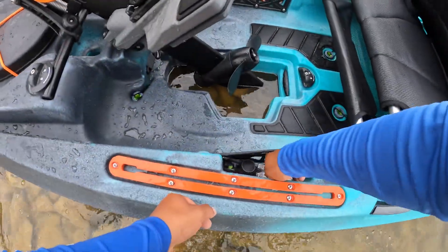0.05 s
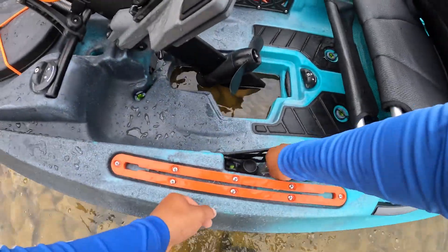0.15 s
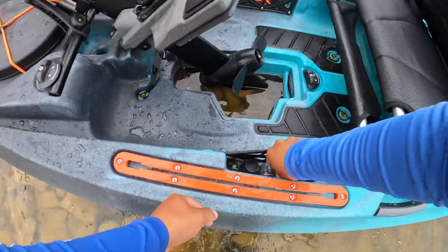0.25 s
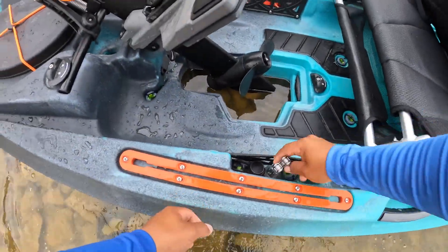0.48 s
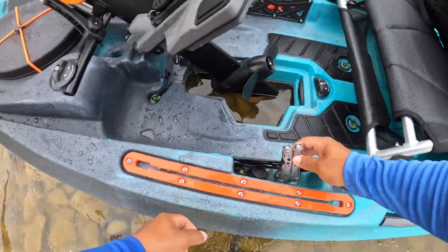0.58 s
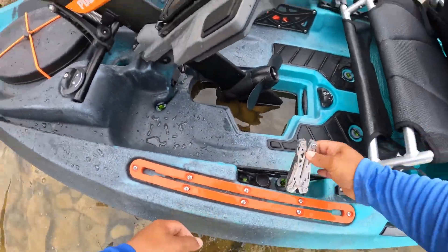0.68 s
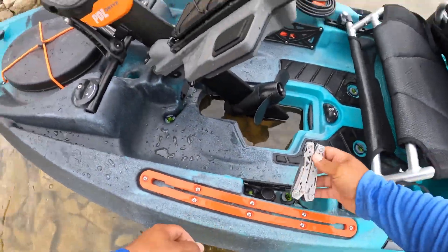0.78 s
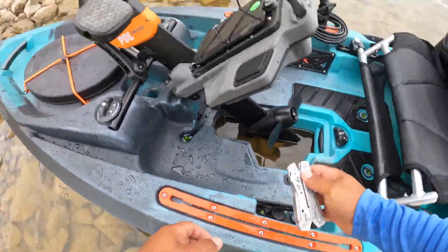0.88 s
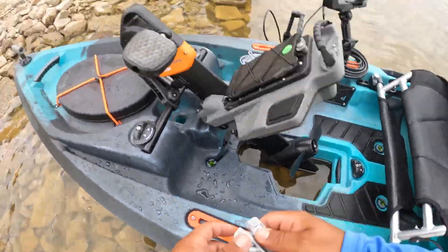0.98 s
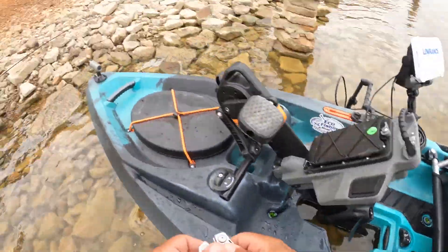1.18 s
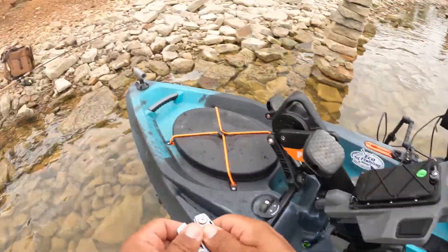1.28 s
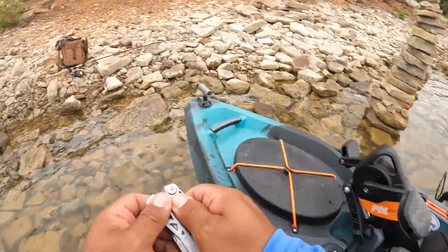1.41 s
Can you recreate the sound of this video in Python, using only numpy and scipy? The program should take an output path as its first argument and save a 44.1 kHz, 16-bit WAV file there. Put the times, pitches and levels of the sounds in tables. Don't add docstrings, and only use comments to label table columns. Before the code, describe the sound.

Hard clattering of a metal tool pulled from a plastic kayak pocket, fading into quiet air.

```python
import sys
import numpy as np
from scipy import signal
from scipy.fft import rfft, irfft, next_fast_len
from scipy.io import wavfile
from scipy.ndimage import uniform_filter1d

SR = 44100
rng = np.random.default_rng(int(sys.argv[2]) if len(sys.argv) > 2 else 0)


def inscribe(sig):
    pcm = np.round(np.clip(np.atleast_2d(sig).T, -1, 1) * 32767)
    wavfile.write(sys.argv[1], SR, pcm.astype(np.int16))


def amplitude_ratio(level_db):
    exponent = np.asarray(level_db, float) / 20
    return 10 ** exponent


N = 63945

# (time [s], level [dB], tick above 3 kHz [dB], chatter length [ms], struck panel [Hz])
CONTACTS = [(0.191, -46.5, -53, 1.5, 1280), (0.2036, -23.5, -38, 1.5, 940), (0.2099, -29, -70, 1.64, 990),
            (0.258, -42, -51.5, 1.2, 1890), (0.295, -24.5, -39.5, 3.3, 1050),
            (0.3237, -26.5, -50.5, 2.6, 1200), (0.3435, -24.5, -40, 1.2, 1240),
            (0.3477, -23.5, -36.5, 6.4, 1400), (0.4420, -29, -36, 2.6, 1550),
            (0.4495, -22.5, -49, 2.9, 1720), (0.483, -20, -34.5, 1.7, 934), (0.4969, -19.5, -37, 4.6, 1040),
            (0.5452, -16.5, -24.5, 1.35, 1250), (0.5594, -16.5, -33.5, 0.37, 916),
            (0.6624, -15.5, -27, 1.24, 1500), (0.6745, -19, -35.5, 1.5, 1430), (0.6791, -21, -35, 3.2, 990),
            (0.6998, -26, -39.5, 0.8, 1190), (0.711, -24, -41.5, 3.6, 1070), (0.7459, -17, -32, 3.4, 1620),
            (1.1144, -42.5, -64, 0.91, 1020), (1.1293, -43, -86, 7.6, 1620), (1.2744, -74, -62.5, 12, 1010),
            (1.3939, -49.5, -88, 26, 1360)]
# (frequency [Hz], level [dB], t60 [s])
DECK_MODES = [(126.6, -2.5, 0.15), (204.4, -3.5, 0.193), (280, -0.5, 0.09), (396, 10, 0.051),
              (578.7, 1.5, 0.06), (700, 5, 0.05), (1005, -5.5, 0.04), (1138, -13, 0.078), (1403, -3, 0.046),
              (1686, 1.5, 0.011), (1783, -12.5, 0.048), (2100, -15.5, 0.088)]
# (frequency [Hz], level [dB], t60 [s])
TOOL_MODES = [(2770, 7, 0.039), (3463, 7, 0.02), (4400, 5.5, 0.007), (5030, 10, 0.004), (5700, 2, 0.0076),
              (7060, 0, 0.0071), (11110, -14.5, 0.023), (12900, -8, 0.0015)]
GRIP_S = 0.18


def unit(x):
    return x / np.sqrt(np.mean(x ** 2) + 1e-18)


def curve(table):
    points = np.array(table)
    return np.interp(np.arange(N) / SR, points[:, 0], points[:, 1])


def ring(force, hz, t60):
    pole = np.exp(2j * np.pi * hz / SR - np.log(1000) / (t60 * SR))
    return signal.lfilter([1], [1, -pole], force).imag


def colour(x, table):
    points, size = np.array(table), next_fast_len(2 * N)
    hz = np.arange(size // 2 + 1) * SR / size + 1
    gain = amplitude_ratio(np.interp(np.log(hz), np.log(points[:, 0]), points[:, 1]))
    return irfft(rfft(x, size) * gain, size)[..., :N]


def walk(rate_hz):
    k = int(SR / rate_hz)
    held = np.repeat(rng.standard_normal(N // k + 1), k)
    return unit(uniform_filter1d(uniform_filter1d(held, k), k)[:N])


def body(forces, modes):
    return sum(amplitude_ratio(db) * ring(force, hz, t60) for force, (hz, db, t60) in zip(forces, modes))


def opposed(db):
    return np.array([[db], [-db]]) / 2


def strike(modes, tail_s, column):
    tail_db, scatter_db, detune = -10.5, 2.5, 0.07
    panel_db, panel_octaves = 8, 0.16
    length = 5000
    out, t = np.zeros(N + length), np.arange(length) / SR
    for row in CONTACTS:
        i, chatter_ms, panel_hz = int(row[0] * SR), max(row[3], 0.3), row[4]
        common = rng.standard_normal(length) ** 3 * np.exp(-t * 1000 / chatter_ms)
        common[0] = 6
        common = common / np.sqrt(np.sum(common ** 2))
        hit = 0
        for hz, db, t60 in modes * 3:
            luck = rng.standard_normal(3)
            tail = rng.standard_normal(length) * np.exp(-t / tail_s)
            force = np.sign(luck[2]) * common + amplitude_ratio(tail_db) * tail / np.sqrt(np.sum(tail ** 2))
            near_db = panel_db * np.exp(-(np.log2(hz / panel_hz) / panel_octaves) ** 2)
            gain = amplitude_ratio(db + near_db + scatter_db * luck[0])
            hit = hit + gain * ring(force, hz * (1 + detune * luck[1]), t60 * 0.81)
        out[i:i + length] += amplitude_ratio(row[column]) * hit / np.max(np.abs(hit))
    return out[:N]


def clacks():
    upper = [(hz, db - 14 * (hz < 500) - 4 * (hz < 900), t60) for hz, db, t60 in DECK_MODES]
    deck = strike(upper, tail_s=0.015, column=1)
    tick = strike(TOOL_MODES, tail_s=0.0054, column=2)
    return amplitude_ratio(2.5) * deck + amplitude_ratio(8) * tick


def cracks():
    # (frequency [Hz], level [dB])
    spectrum = [(1200, -17), (2200, -14.5), (5000, 11), (7000, -21), (9000, -28), (13000, -32),
                (16000, -25)]
    level_db, decay_s, chatter_share = 9.5, 0.0023, 0.23
    out, t = np.zeros(N + 900), np.arange(900) / SR
    for row, noise in zip(CONTACTS, rng.standard_normal((len(CONTACTS), 900))):
        i = int(row[0] * SR)
        decay = np.exp(-t / (decay_s + chatter_share * row[3] / 1000))
        out[i:i + 900] += amplitude_ratio(row[2] + level_db) * noise * decay / 2
    return colour(out[:N], spectrum)


def thuds():
    # (time [s], level [dB], pitch [Hz], t60 [s])
    pushes = [(0.041, -36, 195.6, 0.12), (0.037, -47, 139, 0.061), (.026, -38.5, 357, .12),
              (.058, -39.5, 258, 0.18), (.2045, -32, 1123, 0.037), (.2045, -35, 2980, 0.022),
              (.265, -38, 256, 0.13), (.3245, -23.5, 724, .04), (.3255, -32, 1110, .03),
              (.38, -19, 75, 0.085), (.4495, -28, 1690, 0.025), (.4835, -29, 970, 0.022),
              (.5465, -23, 2110, 0.036), (.566, -23, 280, 0.22), (.575, -22, 700, 0.029),
              (.578, -47, 1880, 0.17), (.664, -17.5, 694, 0.027), (.7475, -28.5, 2060, 0.035),
              (1.116, -33, 1025, 0.014), (1.31, -46, 117, 0.058), (1.393, -47.5, 1064, 0.052),
              (.198, -25.5, 192, 0.11), (.206, -14, 430, 0.027), (0.2119, -9.5, 237.5, 0.018),
              (0.229, -18.5, 221.5, 0.12), (0.253, -25.5, 170.4, 0.2), (0.343, -22, 140, 0.2),
              (0.365, -19, 280, 0.011), (.443, -8, 144, 0.044), (0.449, -12, 280, 0.041),
              (.485, -10.5, 133.4, .12), (.499, -11, 196, 0.04), (.548, -13, 415, 0.043),
              (.558, -13, 326, 0.074), (0.565, -13, 130.6, 0.19), (.6, -22, 205, 0.15),
              (0.695, -26, 145, 0.035), (0.701, -10, 181, 0.017), (0.721, -15.5, 122, 0.077),
              (0.747, -32.5, 185.6, 0.097), (0.761, -20, 91.5, 0.026), (1.119, -26.5, 154, 0.1),
              (1.117, -37, 326, 0.081), (1.115, -31, 634, 0.029), (1.305, -48.5, 635, 0.075),
              (1.328, -51, 4110, 0.038), (1.399, -37, 341, 0.38), (1.424, -48.5, 491, 0.24),
              (1.389, -40, 1405, 0.023)]
    deck_db, dull_db = -15, -4
    out, deck_push = np.zeros(N), np.zeros(N + 900)
    for s, db, hz, t60 in pushes:
        i, soft = int(s * SR), np.hanning(int(SR / hz / 2) + 3)
        push = np.zeros(N + 900)
        push[i:i + len(soft)] = amplitude_ratio(db) * soft / soft.sum()
        out = out + ring(push[:N], hz, t60)
        if 80 < hz < 500 and GRIP_S < s < 1:
            deck_push = deck_push + push
    dull = [(hz, db + dull_db * (hz > 450), t60) for hz, db, t60 in DECK_MODES]
    return out + amplitude_ratio(deck_db) * body([deck_push[:N]] * len(DECK_MODES), dull)


def drag():
    # (time [s], level [dB])
    pressure = [(0, -61), (.018, -45.5), (.055, -40), (.13, -60), (.17, -74.5), (.2, -26.5), (.28, -39.5),
                (.36, -27.5), (.42, -45), (.5, -35), (.57, -22), (.64, -46.5), (.69, -20), (.775, -31),
                (.8, -44), (.9, -64)]
    grains_per_s, scatter_db, tick_db = 2500, 2.5, -25
    slips = (rng.random(N) < grains_per_s / SR) * rng.standard_normal((20, N))
    grains = unit(slips * amplitude_ratio(scatter_db * walk(59.81)))
    dull = [(hz, db - 7 * np.log2(hz / 200), t60 * 0.49) for hz, db, t60 in DECK_MODES]
    deck = unit(body(grains, dull))
    grip = np.where(np.arange(N) > GRIP_S * SR, 1, 0.3)
    tool = unit(body(grains[12:], TOOL_MODES)) * grip
    return (deck + amplitude_ratio(tick_db) * tool) * amplitude_ratio(curve(pressure))


def scrapes():
    # (start [s], length [s], level [dB])
    slides = [
        (.222, 0.084, -66.5),
        (.733, 0.063, -53.5),
        (1.275, .06, -82),
        (0.0087, 0.14, -80.5),
    ]
    edge_s, fade_s = 0.002, 0.027
    t = np.arange(N) / SR
    band = signal.butter(2, (2600, 6300), "band", fs=SR, output="sos")
    grit = unit(signal.sosfilt(band, rng.standard_normal(N) ** 3))
    envelope = 0
    for s, span, db in slides:
        ramp = np.minimum((t - s) / edge_s, (s + span - t) / fade_s)
        envelope = envelope + amplitude_ratio(db) * np.clip(ramp, 0, 1)
    return grit * envelope


def squeak():
    # start [s], level [dB], first pitch [Hz], rise [Hz/s], fade-in [s]
    s, db, hz, rise, fade = (1.405, -59, 2350, 14000, .04)
    t = np.maximum(np.arange(N) / SR - s, 0)
    rough = unit(uniform_filter1d(rng.standard_normal((2, N)), 100))
    phase = 2 * np.pi * (hz * t + rise * t ** 2 / 2)
    rub = rough[0] * np.cos(phase) + rough[1] * np.sin(phase)
    return amplitude_ratio(db) * np.minimum(t / fade, 1) * rub


def puffs():
    # (time [s], level [dB], pitch [Hz], t60 [s], left minus right [dB])
    gusts = [(0.594, -26, 39.6, 0.22, 5), (0.641, -26.5, 45.5, 0.11, 10), (0.691, -22.5, 37, 0.24, -9.5),
             (0.726, -28, 32.8, 0.058, 1), (0.767, -24, 56, 0.04, -23), (0.859, -28.5, 64.2, 0.31, -5),
             (0.891, -21.5, 35.4, 0.15, -8), (0.905, -21, 93.3, 0.046, -6), (0.943, -47, 35.6, .1, -3),
             (1.003, -38, 61.4, 0.31, -8), (1.034, -36, 69.7, 0.07, -3), (1.041, -50, 29.5, 0.039, -4),
             (1.308, -33.5, 33.2, 0.17, 1)]
    out = np.zeros((2, N))
    for s, db, hz, t60, pan_db in gusts:
        i, suck, soft = int(s * SR), np.zeros(N), np.hanning(int(SR / hz / 3))
        suck[i:i + len(soft)] = -soft / soft.sum()
        out = out + amplitude_ratio(db + opposed(pan_db)) * ring(suck, hz, t60)
    return signal.sosfilt(signal.butter(1, 12, "high", fs=SR, output="sos"), out)


def buffet():
    # (time [s], level [dB])
    air = [(0.0, -58.5), (0.192, -60.5), (0.3, -67), (0.4, -58), (0.52, -48), (0.774, -36.5), (0.84, -43.5),
           (0.97, -52), (1.1, -54), (1.25, -58), (1.45, -55.5)]
    side_db, pan_db = -7.5, 2
    band = signal.butter(3, [18, 84], "band", fs=SR, output="sos")
    mid, side = unit(signal.sosfilt(band, rng.standard_normal((2, N))))
    mid = mid / np.sqrt(uniform_filter1d(mid ** 2, 2200) + 0.087)
    ports = mid * amplitude_ratio(opposed(pan_db)) + amplitude_ratio(side_db) * side * np.array([[1], [-1]])
    return amplitude_ratio(curve(air)) * ports


def airy_noise():
    # (frequency [Hz], width [Hz], level [dB], left minus right [dB])
    resonances = [(544, 76, -3.5, 6), (1826, 140, -4, 11.5), (1956, 650, -3.5, 8), (2286, 92, -4.5, 4.5),
                  (3280, 520, -15, 19), (12800, 1400, -19, 15.5)]
    # (time [s], level [dB])
    airflow = [(0, -81), (.18, -92), (.3, -79), (.45, -61.5), (.6, -55), (.8, -60), (.95, -68), (1.08, -72),
               (1.125, -65.5), (1.17, -66.5), (1.22, -65.5), (1.3, -74.5), (1.45, -77.5)]
    noise, out = rng.standard_normal((3, N)), 0
    flow = noise[:2] + 0.87 * noise[2]
    for hz, width_hz, db, pan_db in resonances:
        edges_hz = [hz - width_hz / 2, hz + width_hz / 2]
        band = signal.butter(2, edges_hz, "band", fs=SR, output="sos")
        out = out + amplitude_ratio(db + opposed(pan_db)) * unit(signal.sosfilt(band, flow))
    return out * amplitude_ratio(curve(airflow))


def hush():
    # (frequency [Hz], level per Hz [dB])
    spectrum = [(88, -72), (150, 10.5), (475, -3.5), (716, -6), (790, -1.5), (2310, -6.5), (3490, -13),
                (12900, -30.5), (16000, -49)]
    # (time [s], level [dB])
    swell = [(0, -71.5), (.15, -79), (.3, -109), (.45, -51), (.8, -66.5), (1.08, -67), (1.14, -60.5),
             (1.26, -64), (1.37, -64), (1.45, -65.5)]
    flicker_db, self_noise_db = 1.0, -80.5
    noise = rng.standard_normal((3, N))
    wide = noise[:2] + 1.4 * noise[2]
    shore = unit(colour(colour(wide, spectrum), [(14000, 3), (15500, -22)]))
    hiss = unit(colour(rng.standard_normal((2, N)), [(300, 0.5), (13500, -12.0), (16000, -34)]))
    return shore * amplitude_ratio(curve(swell) + flicker_db * walk(29.75)) + amplitude_ratio(self_noise_db) * hiss


def scene():
    # (frequency [Hz], level [dB])
    mic = [(25, -35), (70, -2.5), (2200, 0.5), (2700, -8), (6000, -2.5), (8500, -15), (13500, -1.5),
           (16300, -38)]
    # (frequency [Hz], side minus mid [dB])
    ports = [(60, -33), (200, -39), (500, -11), (1000, -11.5), (2000, -4), (4400, -5.5), (8000, -9.5),
             (13000, -3)]
    # (frequency [Hz], level [dB])
    left_treble = [(7000, -53), (12000, -7)]
    smear_db = -20
    gear = colour(clacks() + thuds() + drag() + squeak(), mic)
    smear = rng.standard_normal(400) * np.exp(-np.arange(400) / 100.0)
    smeared = signal.lfilter(smear / np.sqrt(np.sum(smear ** 2)), 1, gear)
    quadrature = irfft(1j * rfft(gear), N)
    side = colour(quadrature + amplitude_ratio(smear_db) * smeared, ports) + colour(gear, left_treble)
    handling = gear + np.array([[1], [-1]]) * side
    contact = (colour(cracks(), mic) + scrapes()) * np.array([[0.9], [1.1]])
    return handling + contact + puffs() + buffet() + airy_noise() + hush()


def roll_off(x):
    return signal.sosfilt(signal.butter(12, 16320, fs=SR, output="sos"), x)


def record(dry):
    return roll_off(dry)


dry = scene()
out = record(dry)
inscribe(out)
```